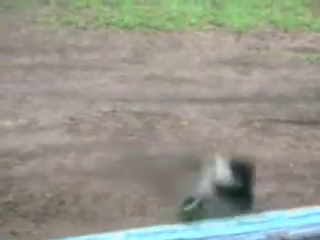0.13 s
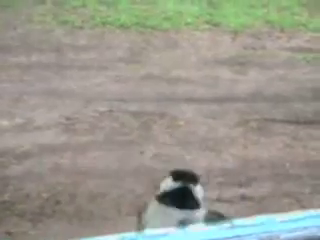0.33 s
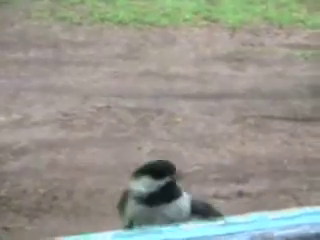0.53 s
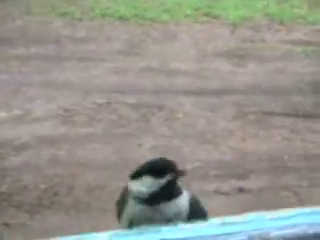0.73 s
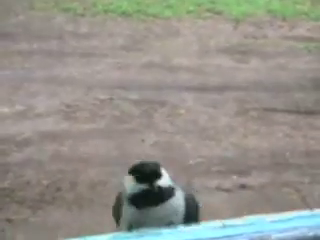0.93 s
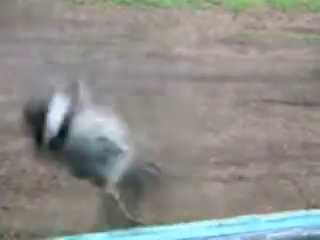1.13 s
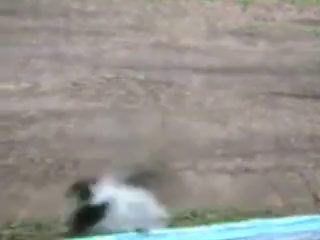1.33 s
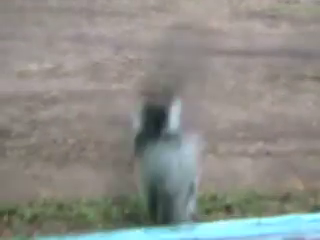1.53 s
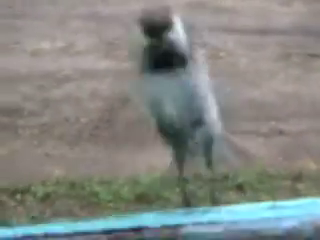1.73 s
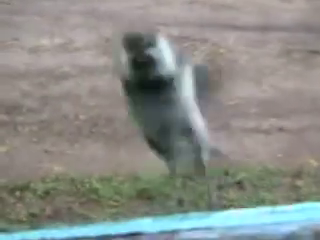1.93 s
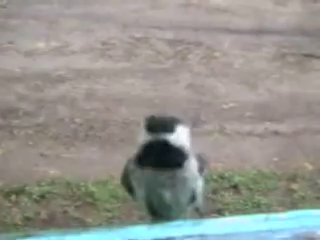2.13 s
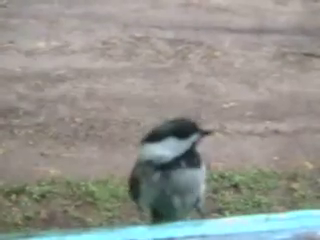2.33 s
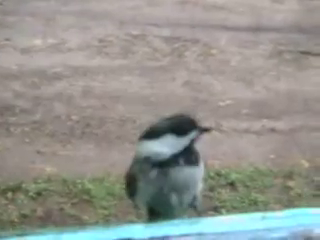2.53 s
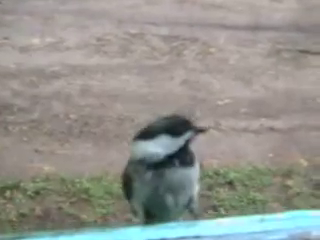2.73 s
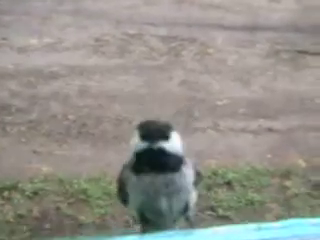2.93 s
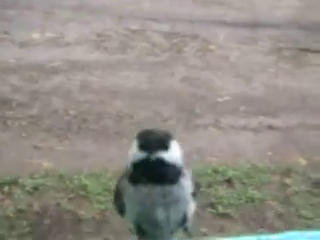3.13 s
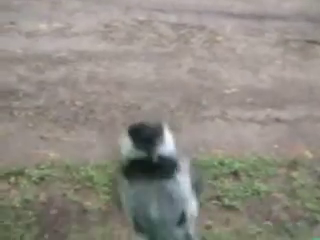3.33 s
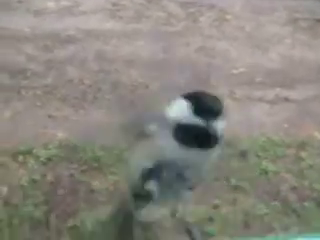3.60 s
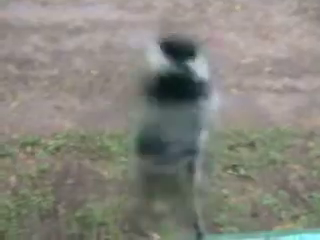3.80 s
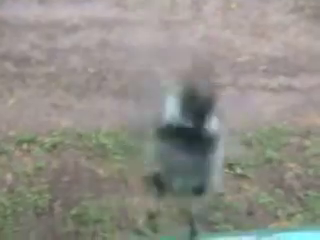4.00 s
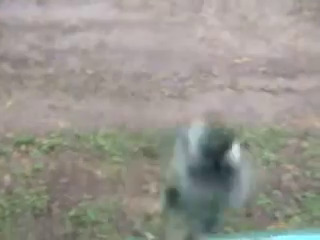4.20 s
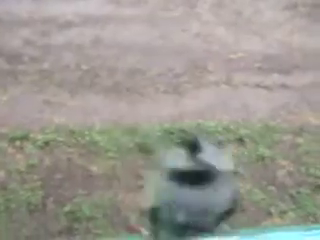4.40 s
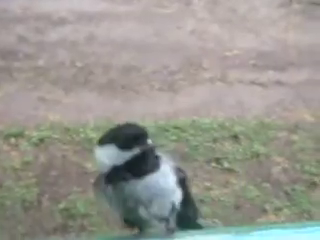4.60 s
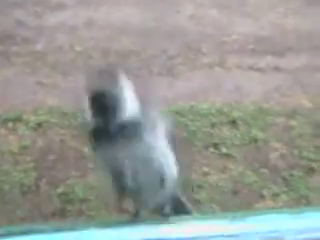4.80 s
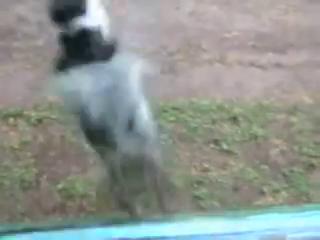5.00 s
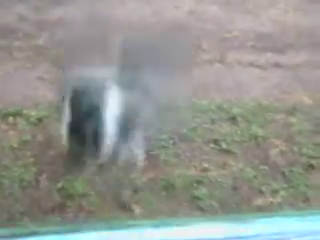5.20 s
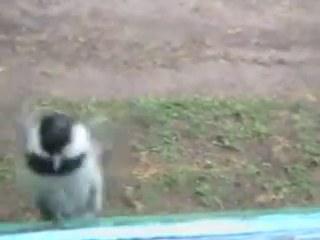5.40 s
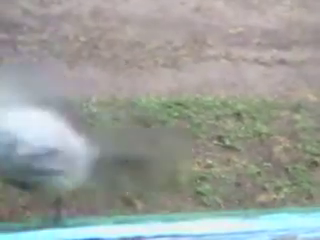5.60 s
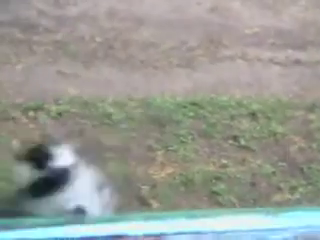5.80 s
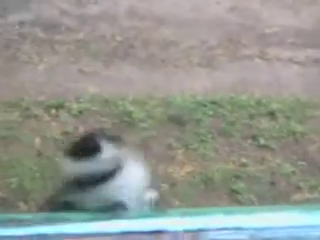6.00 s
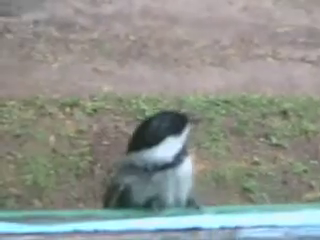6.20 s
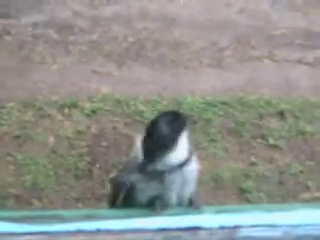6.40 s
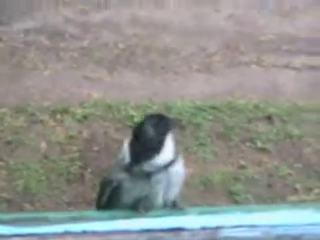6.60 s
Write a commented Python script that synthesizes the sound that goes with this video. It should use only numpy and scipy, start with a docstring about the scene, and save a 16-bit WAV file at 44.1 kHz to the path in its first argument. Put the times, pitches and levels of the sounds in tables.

```python
"""In a room, beside a window: a small bird flies at the pane again and again, heard from the inside.
Its beak knocks ring the glass modes and the room; claws and wing tips tick and brush as grainy clicks.
A far bird chirps in faint rising glides, over still air with a low rumble.
At the microphone a small motor, likely the camera's focus, rattles and plinks in even trains of steps,
then runs on with a wavering whine and a soft rush."""
import sys
import numpy as np
from scipy import signal
from scipy.fft import rfft, irfft
from scipy.io import wavfile
from scipy.ndimage import uniform_filter1d

SR = 44100
rng = np.random.default_rng(int(sys.argv[2]) if len(sys.argv) > 2 else 0)


def master(y):
    """Save y as 16-bit WAV."""
    cut = np.clip(np.atleast_2d(y).T, -1, 1)
    pcm = np.round(cut * 32767)  # scale
    wavfile.write(sys.argv[1], SR, pcm.astype(np.int16))


N = 292367


def amp(db):
    """Decibels to gain."""
    return 10 ** (np.asarray(db) / 20)


def evened(x):
    """Scales to rms 1."""
    return x / np.sqrt(np.mean(x ** 2) + 1e-20)


def read(points, hz):
    """Reads a table on a log-frequency axis."""
    f, value = np.transpose(points)
    return np.interp(np.log(hz + 1), np.log(f + 1), value)


def add(mix, s, sound):
    """Adds a sound to the mix at time s, in place."""
    part = mix[max(round(s * SR), 0):][:len(sound)]
    part += sound[:len(part)]


def through(x, response):
    """Convolves, keeping the length."""
    return signal.fftconvolve(x, response)[:len(x)]


def random_signs():
    """One second of dense clicks of either sign."""
    return rng.choice([-1., 1.], SR)


def tinted(x, colour):
    """Gives a long sound a spectrum, at rms 1."""
    hz = np.fft.rfftfreq(len(x), 1 / SR)
    return evened(irfft(rfft(x) * amp(read(colour, hz)), len(x)))


def click(colour, size=4096):
    """A causal, minimum-phase click of energy 1 with the given spectrum."""
    hz = abs(np.fft.fftfreq(size, 1 / SR))
    log_gain = np.log(amp(read(colour, hz)))
    spectrum = np.exp(np.conj(signal.hilbert(log_gain)))  # the phase follows from the log gain
    wave = irfft(spectrum[:size // 2 + 1])
    return wave / np.linalg.norm(wave)


def narrow_noise(hz, width):
    """Noise in one narrow resonance, rms 1."""
    f = np.fft.rfftfreq(N, 1 / SR)
    return evened(irfft(rfft(rng.standard_normal(N)) / (1 + ((f - hz) / width) ** 2), N))


def blip(hz, peak_s):
    """A short hollow ring whose envelope swells to 1 at peak_s and dies."""
    t = np.arange(SR) / SR
    return np.sin(2 * np.pi * hz * t) * t / peak_s * np.exp(1 - t / peak_s)


# how long the room holds each band: pitch_hz, t60_s
ROOM_DECAY = [(100, 0.49), (250, 0.86), (600, 0.29), (1200, .37), (2500, 0.37), (4500, 0.2), (7000, 0.058)]


def reflections(rise_s):
    """One second of dense room reflections that build up over rise_s, each band dying at its own speed."""
    hz, t, z = signal.stft(random_signs(), SR, nperseg=256)
    decay = amp(-60 * t / read(ROOM_DECAY, hz)[:, None])
    tail = signal.istft(z * decay, SR, nperseg=256)[1][:SR]
    return tail * (1 - np.exp(-(np.arange(SR) / SR / rise_s) ** 2))


# colour of the still air at the microphone: pitch_hz, relative_density_db
AIR_COLOUR = [(15, -31), (25, -15), (146, -3), (177, -4), (209, -3.5), (266, -10), (339, -6.5),
              (475, -13.5), (635, -2.5), (716, -13), (828, -9.5), (1250, -19), (2020, -20.5), (8000, -46),
              (10400, -80), (17600, -120)]
AIR_DB = -64.5


def background(rumble_db=-73):
    """Still air as coloured noise, with a low rumble in one narrow resonance."""
    air = amp(AIR_DB) * tinted(rng.standard_normal(N), AIR_COLOUR)
    return air + amp(rumble_db) * narrow_noise(64, 7)


# ringing modes of the window pane: pitch_hz, relative_level_db, t60_s
PANE_MODES = [(114.5, -32.5, .7), (150.6, -27.5, 0.57), (218.4, -29.5, .8), (235.4, -27, .4),
              (290, -30, 0.88), (324.8, -17, 0.27), (394, -10.5, 0.23), (489, -19, .25),
              (573.6, -0.5, 0.21), (619.3, -1, 0.12), (674, -22, 0.2), (693, -16.5, 0.3),
              (808, -12.5, 0.14), (870, -10.5, 0.27), (955, -14, 0.24), (1060, -23, 0.23),
              (1080, -19, 0.15), (1199, -20, 0.11), (1370, -16, 0.24), (1415, -20.5, 0.27),
              (1554, -21, 0.18), (1670, -23, 0.12), (1889, -25, 0.31), (1998, -20, .16), (2175, -20, 0.11),
              (2692, -29, .15)]


def pane_ring(spot_db=2.25, build_s=.011):
    """The pane's modes build up as waves cross it; each spot on the glass weights them differently."""
    t = np.arange(SR) / SR
    hz, db, t60 = np.transpose(PANE_MODES)[:, :, None]
    weight = rng.standard_normal(hz.shape)
    side = (-1) ** np.arange(len(hz))[:, None]  # neighbouring modes start in opposite directions
    modes = side * amp(db + spot_db * weight - 60 * t / t60) * np.sin(2 * np.pi * hz * t)
    return modes.sum(0) * (1 - np.exp(-t / build_s))


# beak blows on the pane: start_s, relative_level_db, relative_body_shove_db
BEAK_BLOWS = [(0.034, -22, -16), (1.065, -14.5, -14), (1.622, -8.5, -13), (1.788, -8.5, -14),
              (1.9627, -6, 5.5), (3.43, -9.5, -24), (3.8819, -21.5, -9), (4.0982, -8.5, 3),
              (4.8824, -8.5, -23.5), (5.0483, -7.5, -7)]
# colour of a blow's first crack: pitch_hz, relative_level_db
CRACK_COLOUR = [(40, -37.5), (100, -26.5), (190, -6.5), (310, 4), (440, -6), (590, -1.5), (760, -3.5),
                (960, -3.5), (1400, -15.5), (2350, -24), (3000, -31.5), (5000, -44.5), (7000, -51.5)]
# colour of the short waves that rattle in the frame: pitch_hz, relative_level_db
RATTLE_COLOUR = [(300, -26.5), (700, -11.5), (1000, -5.5), (1400, 0), (2100, -0.5), (2500, -2),
                 (2900, -11.5), (3700, -23.5), (5000, -26), (7000, -44)]
# colour of the room's answer to a blow: pitch_hz, relative_level_db
WASH_COLOUR = [(50, -23.5), (115, -9), (260, -10), (450, -5.5), (650, 8.5), (1000, 2.5), (1400, -4),
               (2100, -9.5), (2700, -16), (3400, -26), (5000, -31.5), (7000, -43.5)]
# colour of a claw tick, here and in touches(): pitch_hz, relative_level_db
TICK_COLOUR = [(300, -25), (1500, -4), (3000, 4), (4800, 3), (6200, -4.5), (7500, -10.5)]


def knocks(crack_db=17, echo_db=4, rattle_db=-5, ring_db=-1.38, wash_db=-11.5, shove_db=-21,
           shove_s=0.0035, skitter_db=-54, skitter_s=0.082, skips_per_s=90):
    """A beak blow: a crack, waves thrown back by the frame, ringing modes, the room, and the body's shove."""
    out, t = np.zeros(N), np.arange(SR) / SR
    echo_s, rattle_s, rise_s, scrape_s = .0018, .006, .0012, .003
    direct = np.zeros(SR)
    add(direct, 0, click(CRACK_COLOUR))
    add(direct, echo_s, amp(echo_db) * click(CRACK_COLOUR))  # the first waves back from the frame
    # short waves crowd in behind them
    crowding = np.exp(-t / rattle_s) * (1 - np.exp(-t / rise_s))
    # the body's push swings out and back
    shove = t / shove_s * (2 - t / shove_s) * np.exp(-t / shove_s)
    for s, db, body_db in BEAK_BLOWS:
        rattle = through(random_signs() * crowding, click(RATTLE_COLOUR))
        wash = through(reflections(0.00067), click(WASH_COLOUR))
        blow = amp(crack_db) * direct + amp(rattle_db) * rattle
        blow += amp(wash_db) * wash + amp(ring_db) * pane_ring()
        blow += amp(shove_db + body_db) * shove
        add(out, s, amp(db) * blow)
        # the claws skitter down the glass as sparse scrapes, at a level apart from the blow's
        sparse = rng.random(SR) < skips_per_s / SR
        skips = rng.standard_normal(SR) * sparse * np.exp(-t / skitter_s)
        scrape = through(rng.standard_normal(SR) * np.exp(-t / scrape_s), click(TICK_COLOUR))
        add(out, s, amp(skitter_db) * through(skips, scrape))
    return out


# spells of fluttering at the glass: start_s, end_s
FLUTTERS = [(1.5, 1.8), (3.45, 4.25), (5.2, 5.87)]
BRUSHES_PER_S, BRUSH_DB, BRUSH_SPREAD_DB, BRUSH_PUSH_DB = 13, -65, 3.5, -55


def brushes(decay_s=.009):
    """Light touches, one at random in each even slot of a flutter, as rows like those of CLEAR_TOUCHES."""
    rows = []
    for start, end in FLUTTERS:
        count = round((end - start) * BRUSHES_PER_S)
        for k, (late, strength) in enumerate(rng.random((count, 2))):
            s = start + (k + late) / BRUSHES_PER_S
            db = BRUSH_SPREAD_DB * (2 * strength - 1)
            rows.append((s, BRUSH_DB + db, BRUSH_PUSH_DB + db, decay_s))
    return rows


# the clearest claw and feather touches: start_s, relative_tick_db, relative_push_on_pane_db, decay_s
CLEAR_TOUCHES = [(0.162, -62, -77, 0.018), (0.316, -67, -55.5, 0.018), (0.52, -64.5, -56, 0.02),
                 (1.085, -49.5, -55, 0.0064), (1.201, -55.5, -68.5, 0.0077), (1.267, -56, -38.5, 0.016),
                 (1.366, -65, -54, 0.015), (2.09, -52, -44, 0.0068), (2.226, -66.5, -52, .01),
                 (3.349, -70.5, -50.5, 0.0083), (3.392, -68, -49, 0.0043), (3.615, -49, -40, 0.0095),
                 (3.698, -57, -43.5, 0.011), (3.791, -51.5, -40.5, .012), (4.03, -54, -47, 0.01),
                 (4.227, -54, -57.5, .012), (5.26, -51.5, -38.5, 0.023), (5.354, -57, -51, 0.011),
                 (5.434, -55, -47, 0.013), (5.517, -58.5, -49.5, 0.016), (5.638, -57.5, -44.5, 0.017),
                 (5.716, -59, -48, 0.022), (5.735, -50, -35, 0.0073), (5.829, -62.5, -53, 0.012)]
# colour of a soft push on the glass: pitch_hz, relative_level_db
PUSH_COLOUR = [(40, -19), (120, -4.5), (400, 3), (700, 1), (950, -3), (1400, -1.5), (2300, -7.5),
               (3500, -24), (7000, -48.5)]
# every touch sounds the struck spot near one pitch (scatter as a share of it)
SPOT_HZ, SPOT_SCATTER = 924, .16


def touches(tick_db=3, push_db=-0.5, spot_db=-4, ring_db=-15, room_db=-35, grains_per_s=1500):
    """Claws and feathers catch and slip on the glass: brief clumps of tiny clicks that also stir the pane."""
    out, t = np.zeros(N), np.arange(SR) / SR
    tick, push = click(TICK_COLOUR), click(PUSH_COLOUR)
    spot_s = .004
    for s, db, body_db, decay_s in CLEAR_TOUCHES + brushes():
        # strain builds unevenly and slips at each whole step, the first at contact
        strain = np.cumsum(rng.exponential(1, SR) ** 2) / 2 * grains_per_s / SR
        slips = np.diff(np.floor(strain), prepend=-1) > 0
        grains = evened(random_signs() * slips) * np.exp(-t / max(decay_s, .001))
        hz = SPOT_HZ * (1 + SPOT_SCATTER * rng.uniform(-1.3, 1))
        body = amp(push_db) * through(grains, push) + amp(spot_db) * blip(hz, spot_s)
        scratch = amp(db + tick_db) * through(grains, tick) + amp(body_db) * body
        echo = amp(room_db) * through(scratch, reflections(0.0099))
        ring = amp(body_db + ring_db) * pane_ring()
        add(out, s, scratch + echo + ring)
    return out


# even trains of motor steps, close to the microphone: first_s, last_s, interval_s, relative_level_db
STEP_TRAINS = [(0.187, 1.587, .1, -63.5), (2.256, 3.256, .1668, -62), (4.592, 4.759, .1668, -59.5),
               (6.19, 6.338, .148, -61)]
# steps differ a little in strength; each plinks near one pitch
STEP_SPREAD_DB, STEP_HZ, STEP_SCATTER_HZ = 1.5, 1105, 22


def motor_steps(plink_db=4.5, rattle_db=1.5, rattle_s=.006, room_db=-42):
    """Each step of the motor is a small rattle and a short hollow plink."""
    out, t = np.zeros(N), np.arange(SR) / SR
    plink_s = .0035
    # colour of the rattle: pitch_hz, relative_level_db
    tick = click([(200, -15.5), (500, -4.5), (750, 7.5), (1250, -3), (1700, -12), (3700, -14.0), (6000, -37)])
    for first, last, interval, db in STEP_TRAINS:
        for s in np.arange(first, last + interval / 2, interval):
            strength, pitch = rng.standard_normal(2)
            rattle = through(random_signs() * np.exp(-t / rattle_s), tick)
            plink = blip(STEP_HZ + STEP_SCATTER_HZ * pitch, plink_s)
            step = amp(plink_db) * plink + amp(rattle_db) * rattle
            add(out, s, amp(db + STEP_SPREAD_DB * strength) * step)
    return out + amp(room_db) * through(out, reflections(0.004))


# stretches where the motor runs on: start_s, end_s
MOTOR_RUNS = [(5.87, 6.29), (6.32, 6.41), (6.45, 6.7)]
# colour of the running motor's rush: pitch_hz, relative_level_db
RUSH_COLOUR = [(100, -0.5), (400, 0.5), (900, -3.5), (1250, 1), (1600, -15.5), (2300, -18), (3500, -24.5),
               (7000, -29.5)]
# runs fade in and out alike and grow louder with time; a faint hum lies beneath from IDLE_FROM_S on
RUN_DB, RUN_SWELL_DB_PER_S, RUN_FADE_S = -64.5, 3.5, .02
IDLE_DB, IDLE_FROM_S = -73.5, 2.45


def motor_whine(whine_hz=619, waver_hz=6, rough=0.35, overtone_hz=1200, overtone_db=-12.0, rush_db=-8):
    """The running motor: a wavering whine with a blurred overtone and a soft rush."""
    t = np.arange(N) / SR
    running = sum(np.clip(np.minimum(t - start, end - t) / RUN_FADE_S + .5, 0, 1)
                  for start, end in MOTOR_RUNS)
    swell_db = RUN_SWELL_DB_PER_S * (t - MOTOR_RUNS[0][0])
    idling = np.clip((t - IDLE_FROM_S) / RUN_FADE_S, 0, 1)
    level = amp(RUN_DB + swell_db) * running + amp(IDLE_DB) * idling
    pitch = whine_hz + waver_hz * narrow_noise(0, 5.5)
    tone = np.sin(2 * np.pi * np.cumsum(pitch) / SR)
    whine = evened(tone * (1 + rough * narrow_noise(19, 9)))
    overtone = amp(overtone_db) * narrow_noise(overtone_hz, 40)
    rush = amp(rush_db) * tinted(rng.standard_normal(N), RUSH_COLOUR)
    return level * (whine + overtone + rush)


# chirps of a far bird, all the same short rising glide: start_s, level_db
FAR_CHIRPS = [(2.803, -73), (2.842, -72), (2.886, -72), (2.93, -79), (3.07, -72.5)]
CHIRP_S, CHIRP_START_HZ, CHIRP_END_HZ = 0.053, 3750, 4330


def chirps(waver_hz=500, room_db=-32):
    """Thin glides of a far bird, husky from a fast random waver in pitch and blurred by echoes."""
    out, n = np.zeros(N), round(CHIRP_S * SR)
    for s, db in FAR_CHIRPS:
        waver = evened(uniform_filter1d(rng.standard_normal(SR), size=30))[:n]
        hz = np.linspace(CHIRP_START_HZ, CHIRP_END_HZ, n) + waver_hz * waver
        add(out, s, amp(db) * np.hanning(n) * np.sin(2 * np.pi * np.cumsum(hz) / SR))
    return out + amp(room_db) * through(out, reflections(0.0077))


def scene():
    """Everything at the window, in one channel."""
    return (background() + knocks() + touches() + motor_steps() + motor_whine() + chirps())[None]


def record(dry, treble_hz=6300, edge_hz=8400):
    """A small camera's microphone: the hardest blows flatten, the treble rolls off, then the band limit."""
    squeezed = dry / (1 + (dry / .71) ** 12) ** (1 / 12)
    dulled = signal.sosfilt(signal.butter(7, treble_hz, fs=SR, output="sos"), squeezed)
    band_limit = signal.firwin(255, edge_hz, window=("kaiser", 9), fs=SR)[None]
    return signal.oaconvolve(dulled, band_limit, "same")


dry = scene()
out = record(dry)
master(out)
```